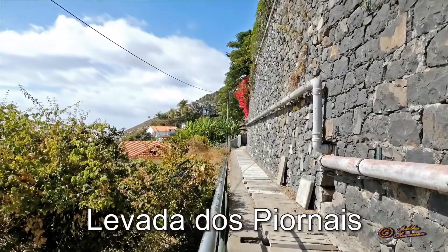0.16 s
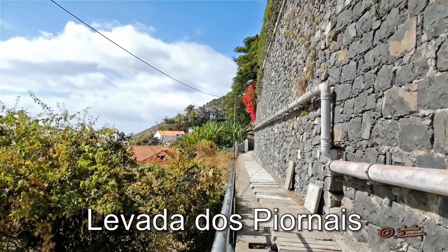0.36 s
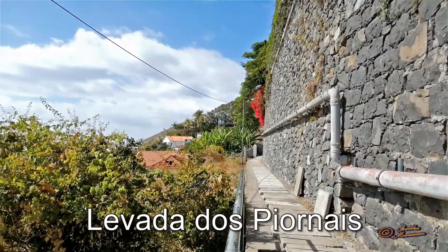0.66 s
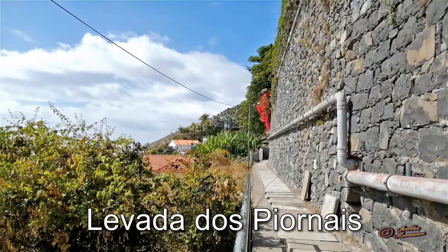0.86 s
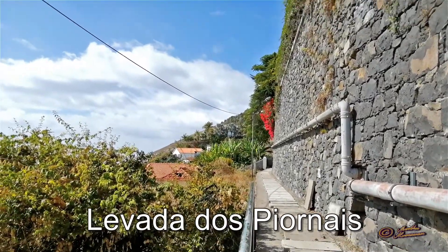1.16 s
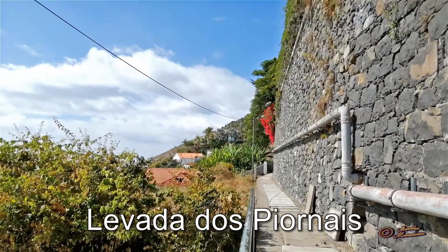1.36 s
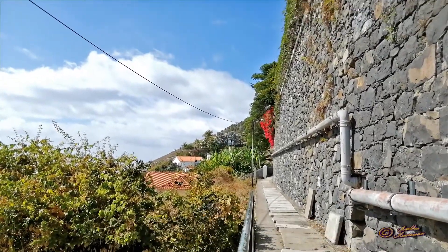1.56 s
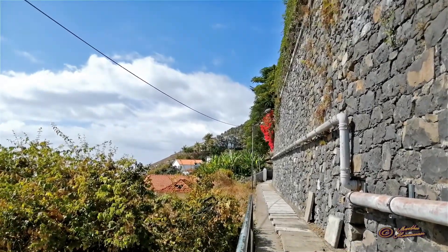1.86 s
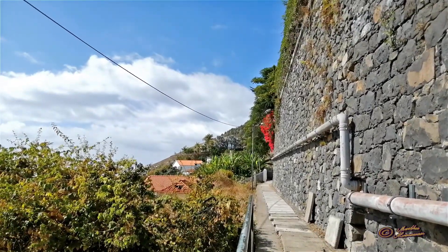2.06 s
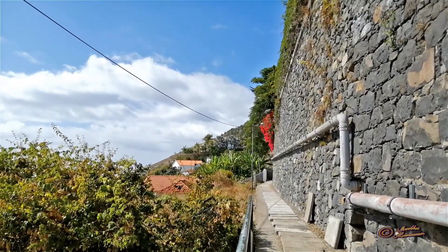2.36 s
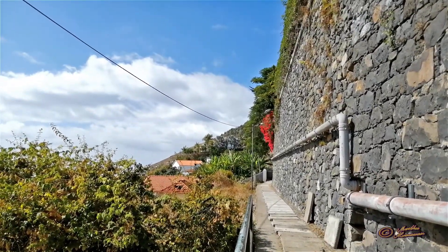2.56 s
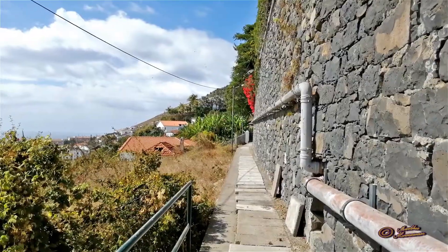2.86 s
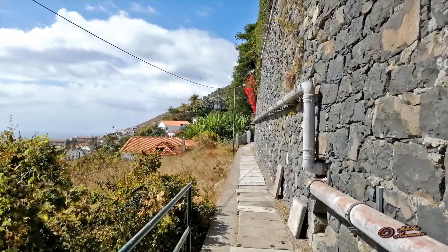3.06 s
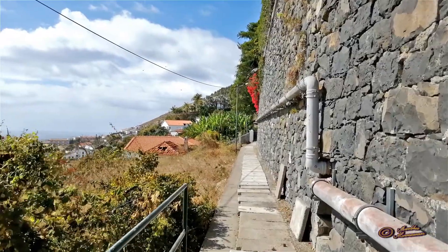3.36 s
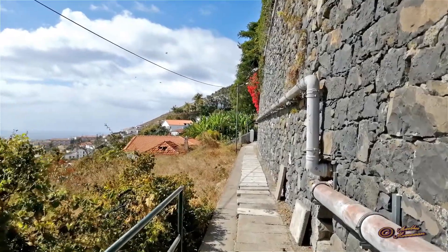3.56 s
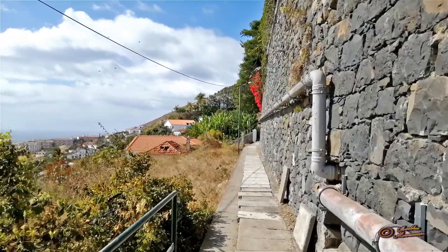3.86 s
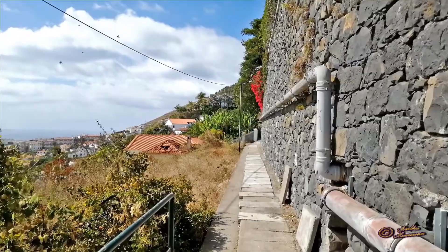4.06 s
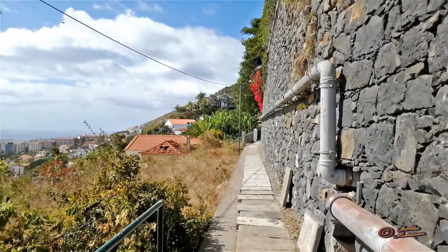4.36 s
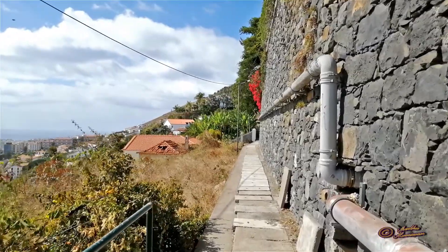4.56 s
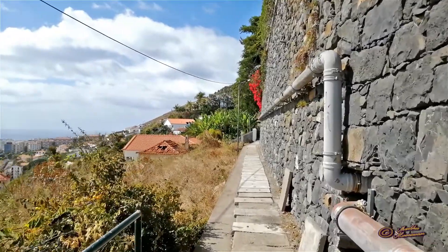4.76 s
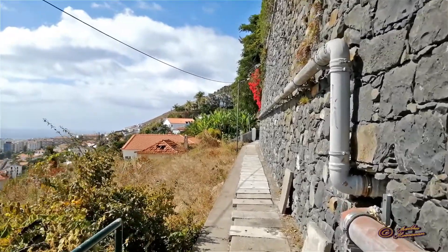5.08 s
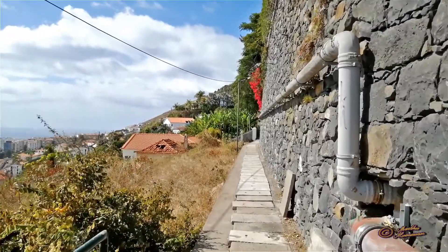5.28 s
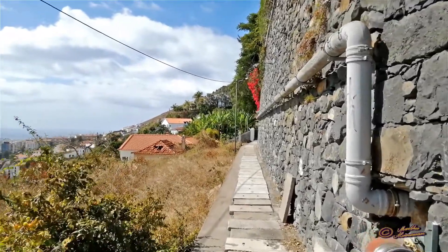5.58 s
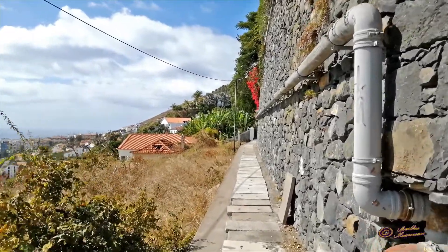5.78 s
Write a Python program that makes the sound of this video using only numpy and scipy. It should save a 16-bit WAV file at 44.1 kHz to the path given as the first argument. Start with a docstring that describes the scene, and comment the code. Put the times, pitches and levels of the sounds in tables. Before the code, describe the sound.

Outdoors, close to a covered stone water channel beside a high wall. Water laps and gurgles throughout in short uneven surges, with bright plops, hollow glugs and fine fizz. Deep wind buffets thump the microphone, strongest just after two seconds and around four seconds. A slab knocks softly a little later. The final seconds are calmer, thinner trickling. Mono, near perspective, only a short dull ring.

```python
"""Water in a stone channel under loose slabs

Water laps in uneven surges beside a high wall: crowds of rising-pitch sine bubbles over coloured-noise wash.
Nearer bubbles, bunches, foam, slaps and sliding glugs stand out, with a hollow slosh of noise below.
Gusts rumble on the microphone as swelling noise bands; a slab knocks dully as three decaying modes.
A faint noise hush lies behind."""
import sys
import numpy as np
from scipy import signal
from scipy.fft import rfft, irfft, next_fast_len
from scipy.io import wavfile
from scipy.ndimage import uniform_filter1d

SR = 44100
rng = np.random.default_rng(int(sys.argv[2]) if len(sys.argv) > 2 else 0)


def unload_wav(signal):
    """Save mono or channel-first audio to the path in sys.argv[1] as 16-bit WAV at rate SR, clipped to [-1, 1]."""
    wavfile.write(
        sys.argv[1],
        SR,
        np.round(np.clip(np.atleast_2d(signal).T, -1, 1) * 32767).astype(np.int16),
    )


N = 261064

# far hush of the valley: (frequency [Hz], density [dB per Hz])
HUSH_COLOUR = [(100, -12), (250, -5), (400, 7.5), (500, -20), (2000, -43), (8000, -29), (11000, -26.5),
               (15000, -43)]
HUSH_DB = -74

# gusts: (start [s], hold [s], big eddies [dB], middling eddies [dB], small eddies [dB])
GUSTS = [(0.0, 0.077, -27, -37, -38), (0.346, 0.11, -36.5, -71, -47.5), (0.587, 0.045, -30, -44, -51),
         (0.85, 0.068, -25.5, -49, -44.5), (1.016, 0.12, -27, -41.5, -47), (1.343, 0.12, -31, -39.5, -44.5),
         (1.526, 0.31, -38.5, -60, -57), (1.892, 0.17, -29, -34.5, -42.5), (2.16, 0.023, -15.5, -32, -37),
         (2.298, 0.064, -24, -34, -43), (2.416, 0.28, -32.5, -42, -45), (2.89, 0.17, -39, -52.5, -61.5),
         (3.087, 0.018, -31, -67, -52), (3.23, 0.04, -30.5, -33.5, -43), (3.54, 0.15, -35, -44.5, -62),
         (3.751, 0.078, -32.5, -43.5, -50.5), (4.055, 0.041, -18.5, -24, -43),
         (4.176, 0.093, -16, -27, -35), (4.353, 0.045, -35.5, -40, -44.5), (4.569, 0.04, -35, -37, -43.5),
         (4.687, 0.12, -39.5, -45, -53), (4.964, 0.021, -30, -41.5, -71), (5.087, 0.12, -35, -47, -52.5),
         (5.353, 0.24, -39, -50.5, -55), (5.58, 0.14, -41.5, -63, -59)]
GUST_RISE_S, GUST_FALL_S, GUST_SAG_DB_PER_S = 0.095, 0.083, 22.5   # rise, fall: time per 20 dB
BREEZE_BIG_DB, BREEZE_MIDDLING_DB, BREEZE_SMALL_DB = -53, -59, -62   # between gusts
# colour of the big eddies: (frequency [Hz], density [dB per Hz])
BUFFET_COLOUR = [(18, 14.5), (27, 7), (41, 5.5), (53, -3), (66, -24)]
# colour of the middling eddies: (frequency [Hz], density [dB per Hz])
RUMBLE_COLOUR = [(45, -15), (58, 4.5), (95, -5.5), (125, -12.5), (160, -16.5)]
# colour of the small eddies: (frequency [Hz], density [dB per Hz])
FLUTTER_COLOUR = [(105, -8.5), (150, 1), (220, -8.5), (300, -16), (410, -27), (480, -33.5), (900, -23.5)]
# colour of the gusts' hiss: (frequency [Hz], density [dB per Hz])
RUSH_COLOUR = [(500, 9.5), (1500, -3), (3500, -17), (6000, -6.5), (8700, -13), (10300, -18.5), (13000, -23),
               (15500, -43)]

# dull knocks of a slab: (time [s], level [dB])
KNOCKS = [(3.235, -40), (4.358, -25), (4.565, -24.5)]
# ringing modes of the slab: (frequency [Hz], level [dB], t60 [s])
SLAB_MODES = [(138, -7, 0.067), (167.8, 10, 0.067), (348, -16, 0.086)]

# water heaving under the slabs: (start [s], hold [s], level [dB])
SLOSHES = [(0.0, 0.12, -47), (0.591, 0.3, -52), (0.97, 0.18, -48), (1.35, 0.19, -54.5), (1.974, 0.24, -56),
           (2.183, 0.17, -50.5), (2.533, 0.14, -53), (3.075, 0.087, -51.5), (3.22, 0.16, -53.5),
           (3.694, 0.072, -67.5), (4.048, 0.16, -49), (4.19, 0.11, -48), (4.598, 0.13, -56.5),
           (4.945, 0.14, -59.5), (5.167, 0.11, -60.5), (5.424, 0.059, -54.5), (5.563, 0.026, -53.5)]
SLOSH_RISE_S, SLOSH_FALL_S, SLOSH_SAG_DB_PER_S = 0.068, 0.1, 7   # rise, fall: time per 20 dB
CALM_SLOSH_DB = -64.5
# colour of the sloshing: (frequency [Hz], density [dB per Hz])
SLOSH_COLOUR = [(215, 4), (300, -2), (400, -1.5), (470, -21)]

# wavelets slapping the stone: (time [s], level [dB], t60 [s])
SLAPS = [(0.037, -48, 0.022), (0.103, -50, 0.044), (1.08, -57, 0.11), (1.429, -53, 0.094),
         (1.836, -47, 0.084), (1.877, -54.5, 0.16), (2.191, -49.5, 0.032), (2.239, -33.5, 0.017),
         (2.423, -51, 0.022), (2.634, -54.5, 0.085), (2.945, -57, 0.022), (3.541, -52.5, 0.07),
         (4.079, -54, 0.0235), (4.332, -56, 0.0406), (4.408, -49, 0.014), (5.001, -58, 0.032),
         (5.219, -50.5, 0.057), (5.577, -60.5, 0.132), (5.621, -53, 0.016)]
# colour of the slaps: (frequency [Hz], density [dB per Hz])
SLAP_COLOUR = [(700, -2), (1500, -8), (3500, 2), (6000, -5), (8500, -1), (10300, -14.5), (15000, -22)]
SLAP_RISE_S, SLAP_GRAIN_DB = 0.005, 3.5   # longest rise; rms unevenness

# patches of foam: (middle [s], length [s], pitch [Hz], level [dB])
FOAM = [(0.42, .12, 4970, -71.5), (0.436, 0.12, 6760, -77), (0.639, 0.24, 8700, -75.5),
        (0.808, 0.22, 8540, -72), (1.581, 0.45, 6950, -73), (1.72, 0.42, 4840, -70.5),
        (3.211, 0.79, 4700, -80), (4.823, 0.22, 4910, -69), (5.247, 0.72, 4310, -70),
        (5.301, 0.4, 7840, -75.5), (3.677, 0.3, 5100, -76), (1.043, 0.38, 8500, -70),
        (2.496, 0.51, 8100, -69), (5.862, 0.16, 3075, -70)]

# hollow sliding glugs: (time [s], length [s], start pitch [Hz], end pitch [Hz], level [dB])
GLUGS = [(.002, 0.07, 810, 944, -49), (0.257, 0.071, 792.6, 805, -52), (.63, 0.066, 614, 850, -45),
         (.965, .06, 785, 827, -47), (1.214, .045, 860, 1010, -50), (1.828, 0.042, 540, 610, -51),
         (2.052, 0.057, 782, 990, -45.5), (2.116, 0.034, 1055, 1130, -46.5),
         (2.482, 0.046, 670, 502, -45.5), (2.633, 0.085, 543.6, 747, -44.5), (2.889, 0.035, 824, 940, -43),
         (4.021, 0.028, 787, 856, -55), (4.12, 0.066, 930, 835, -47.5), (4.18, 0.04, 862, 730, -43),
         (4.199, 0.038, 426, 380, -44), (4.23, 0.059, 864, 930, -52.5), (4.253, .04, 300, 340, -43.5),
         (4.26, 0.07, 1100, 1083, -53), (4.494, 0.028, 1210, 1160, -54), (5.627, 0.044, 733, 815, -51),
         (5.697, 0.043, 640, 674, -53.5)]
GLUG_WAVER, GLUG_FLICKER_DB = .02, 2.2   # unsteadiness of pitch (share) and level
GLUG_SKEW = .75   # under 1 the swell peaks early

# bunches of bubbles: (start [s], length [s], middle pitch [Hz], level [dB])
BURSTS = [(.005, 0.0477, 787, -49), (0.057, 0.067, 8000, -63.5), (0.338, 0.13, 1906, -61),
          (0.368, 0.045, 3680, -64), (0.588, 0.12, 1860, -60.5), (0.848, 0.09, 1540, -53),
          (0.997, .12, 1470, -55), (1.28, .025, 1830, -59), (1.839, 0.064, 2920, -63),
          (1.942, 0.096, 1586, -69), (2.18, 0.046, 2380, -60), (2.24, 0.14, 955, -57.5),
          (2.658, 0.12, 3900, -69), (2.893, 0.032, 5100, -61), (2.982, .06, 1560, -65),
          (3.084, 0.055, 1930, -58.5), (3.169, 0.087, 2200, -56.5), (3.194, 0.072, 4480, -62),
          (3.532, 0.038, 1820, -49), (4.05, 0.043, 2600, -58), (4.176, 0.038, 2010, -54.5),
          (4.36, 0.094, 2480, -63), (4.609, 0.087, 2270, -71), (4.612, 0.058, 3660, -68),
          (4.72, 0.19, 1970, -65), (4.968, 0.049, 1810, -56.5), (5.044, 0.04, 2020, -60),
          (5.199, 0.11, 2290, -57.5), (5.227, 0.076, 3660, -75), (5.563, 0.026, 2340, -59),
          (5.649, 0.1, 1900, -76), (5.286, 0.064, 3700, -71), (5.565, 0.053, 3930, -74),
          (5.78, 0.12, 3140, -71)]
BURST_OCTAVES, BURST_CYCLES = 0.96, 40   # pitch range; cycles per t60
FROTH_DB, FROTH_RISE_S, FROTH_T60_S = -13, .008, 0.11

# near bubbles: (time [s], pitch [Hz], level [dB], t60 [s])
PLOPS = [(.008, 1033, -43, 0.043), (.019, 1920, -40, .04), (.038, 910, -28, 0.014), (.064, 1470, -43, .025),
         (.038, 2770, -31, 0.0074), (.04, 1410, -33.5, 0.039), (.078, 2160, -41.5, .022),
         (.082, 582, -37, 0.057), (.082, 1560, -36, 0.029), (.108, 2570, -42, .022),
         (.122, 3350, -44, 0.0142), (.131, 2120, -27.5, 0.013), (.138, 6740, -49.5, 0.0089),
         (.157, 6600, -49, .01), (.2, 1390, -38, 0.028), (.286, 799, -38, 0.081), (.286, 1060, -45, 0.045),
         (.329, 1420, -36, 0.014), (.338, 2965, -42.5, 0.015), (.406, 1504, -41.5, .035),
         (.442, 910, -29.5, 0.017), (.594, 1500, -42.5, 0.039), (.598, 2180, -38, 0.049),
         (.672, 2932, -29, 0.008), (.776, 1510, -41, 0.027), (.832, 1714, -42, .03),
         (.835, 3570, -44, 0.019), (.868, 606, -29.5, 0.16), (.88, 2600, -40, .02), (.93, 1680, -50, 0.031),
         (.968, 8040, -44, .009), (.969, 1378, -42, 0.027), (.972, 3445, -42, 0.0158),
         (1.0, 597, -38.5, 0.077), (1.039, 1492, -42, 0.034), (1.085, 4150, -43, .012),
         (1.088, 1430, -40, .021), (1.108, 2054, -34.5, 0.035), (1.213, 870, -49, .05),
         (1.222, 2700, -49, .022), (1.261, 3720, -37, 0.013), (1.285, 575, -43.5, 0.072),
         (1.289, 927, -29, 0.041), (1.29, 1370, -36.5, 0.04), (1.365, 368, -41.5, 0.12),
         (1.383, 589, -36, 0.15), (1.38, 2067, -41, 0.0194), (1.385, 6660, -45, .011),
         (1.399, 2598, -45, .026), (1.406, 4570, -29, 0.0023), (1.451, 2840, -41.5, 0.021),
         (1.452, 1656, -31.5, 0.04), (1.516, 1495, -41, .024), (1.521, 6900, -37.5, 0.02),
         (1.521, 3150, -40, 0.013), (1.538, 3760, -33, 0.0046), (1.561, 2030, -47, 0.041),
         (1.693, 4650, -45.5, 0.032), (1.816, 3020, -32.5, 0.0085), (1.837, 4620, -40.5, .016),
         (1.847, 2296, -38.5, 0.021), (1.876, 1534, -40, 0.086), (1.926, 740, -26, 0.013),
         (1.944, 2560, -41, 0.023), (1.945, 1683, -37, 0.022), (1.947, 900, -35.5, .035),
         (1.99, 1380, -41, 0.056), (2.006, 5490, -41.5, 0.0074), (2.01, 880, -39.5, 0.045),
         (2.15, 3900, -30, 0.011), (2.161, 3250, -32, 0.017), (2.167, 4950, -34, .0071),
         (2.177, 2580, -30, 0.011), (2.192, 3120, -33, .015), (2.199, 7735, -39.5, .01),
         (2.207, 2430, -30, 0.02), (2.207, 1785, -33, 0.034), (2.21, 379, -38, 0.059),
         (2.241, 7000, -36, 0.0018), (2.245, 3380, -35.5, 0.019), (2.255, 925, -39, 0.1),
         (2.278, 2526, -40, .018), (2.286, 1570, -30, 0.018), (2.286, 1010, -40, 0.014),
         (2.325, 930, -40, 0.048), (2.344, 1940, -43, .022), (2.308, 5220, -31.5, 0.0034),
         (2.365, 2490, -40, 0.0306), (2.422, 4830, -39, .011), (2.423, 3170, -30, 0.014),
         (2.446, 2446, -36, 0.028), (2.446, 3904, -43, .014), (2.468, 3760, -32.5, 0.0088),
         (2.489, 590, -31.5, 0.029), (2.529, 826, -25, 0.038), (2.574, 2630, -45, 0.018),
         (2.6, 2450, -30, 0.015), (2.606, 3100, -42, 0.021), (2.611, 1400, -48.5, 0.044),
         (2.632, 3560, -42, 0.016), (2.636, 1600, -32.5, 0.03), (2.636, 564, -34, 0.063),
         (2.645, 3120, -41.5, 0.018), (2.707, 685, -27.5, 0.017), (2.781, 1632, -31.5, 0.034),
         (2.91, 6080, -35, 0.013), (2.934, 2440, -38, .025), (2.946, 4330, -38.5, 0.0059),
         (2.946, 6960, -42.5, .01), (2.986, 4134, -41.5, 0.011), (2.989, 2720, -31, 0.012),
         (3.006, 1220, -33, 0.02), (3.055, 747, -42, 0.046), (3.085, 344, -38, 0.047),
         (3.091, 1276, -35.5, 0.04), (3.187, 2530, -35, 0.021), (3.218, 3380, -32, 0.015),
         (3.258, 548, -40, 0.054), (3.473, 2970, -48, 0.02), (3.492, 3070, -38.5, 0.013),
         (3.534, 1690, -45, 0.035), (3.534, 1310, -42, 0.037), (3.548, 2230, -36.5, 0.035),
         (3.57, 1200, -40, 0.064), (3.735, 1160, -43.5, .06), (3.789, 1660, -42.5, 0.04),
         (3.79, 3370, -46, 0.012), (3.812, 6630, -54, .01), (3.975, 661, -35.5, 0.15),
         (3.985, 1297, -39, 0.032), (4.063, 1390, -36.5, .028), (4.08, 2390, -32.5, 0.013),
         (4.086, 1310, -34.5, 0.022), (4.186, 1280, -28, 0.016), (4.189, 1624, -32, 0.029),
         (4.192, 2400, -42, 0.0069), (4.209, 4520, -35.5, 0.011), (4.21, 1970, -28.5, 0.012),
         (4.331, 492, -30.5, 0.039), (4.332, 694, -32, .014), (4.332, 3030, -35, 0.0086),
         (4.368, 2240, -40, .036), (4.375, 1620, -41, 0.024), (4.423, 676, -34.5, 0.098),
         (4.425, 1645, -37, 0.054), (4.562, 2423, -42.5, 0.034), (4.635, 1320, -37.5, 0.039),
         (4.644, 3000, -41.5, 0.015), (4.727, 1410, -43.5, 0.023), (4.77, 4620, -43, 0.013),
         (4.844, 1500, -36, 0.012), (4.977, 7500, -48, 0.0085), (5.003, 1260, -38.5, 0.017),
         (5.102, 7260, -46.5, 0.0076), (5.201, 1252, -43, 0.0314), (5.201, 4134, -46, 0.015),
         (5.202, 2350, -33.5, 0.019), (5.237, 2220, -34.5, 0.017), (5.269, 1330, -37.5, 0.024),
         (5.323, 8240, -45, 0.012), (5.343, 2950, -41, 0.012), (5.391, 4194, -39, 0.011),
         (5.417, 4130, -41, 0.008), (5.445, 2280, -31.5, 0.023), (5.452, 1560, -42, 0.028),
         (5.484, 8140, -49, 0.0062), (5.545, 346, -52, 0.117), (5.58, 1119, -34.5, 0.076),
         (5.681, 1790, -41, 0.024), (5.728, 8200, -51, 0.0067)]
PLOP_RISE_PER_S = 3.8   # share of its pitch that a bubble gains per second
PINCH_CYCLES = 0.95   # time constant of the onset
# lesser near bubbles, at random
STRAYS_PER_S, STRAY_LOW_HZ, STRAY_HIGH_HZ, STRAY_CYCLES = 6, 930, 6700, 49   # cycles per t60
STRAY_DB, STRAY_SPREAD_DB, STRAY_DB_PER_OCTAVE = -46, 19, 6
# bubbles shed by a near one: level re its own, latest start, pitch range
COMPANION_DB, COMPANION_LAG_S, COMPANION_OCTAVES = -10.5, .014, 0.83

# surges of the flow: (start [s], hold [s], level before trims [dB],
# large bubbles [dB re level], tiny bubbles [dB re level])
SURGES = [(0.0, 0.18, -58.5, 1, -10.5), (0.353, 0.1, -60, 4, -8.5), (0.592, 0.13, -61, 7.5, -8),
          (0.84, 0.31, -56.5, 4.5, -5.5), (1.29, 0.17, -57, 5, -8.5), (1.525, 0.014, -55.5, 3, -8),
          (1.64, 0.31, -60, -2.5, -11.5), (1.83, 0.27, -55, -5, -11.5), (2.159, 0.049, -49.5, 0.5, -6),
          (2.24, 0.3, -57, -12, -6.5), (2.42, 0.2953, -64, 14, -5), (2.918, 0.25, -60.5, 6.5, -8.5),
          (3.201, 0.11, -63, -2, -12), (3.542, 0.029, -60.5, 4.5, -6), (3.62, 0.043, -62, -4, -15),
          (3.706, 0.068, -57.5, -12, -16), (3.987, 0.16, -54.5, -2.5, -10.5),
          (4.17, 0.25, -54.5, 2.5, -7.5), (4.605, 0.16, -57.5, -7, -13), (4.947, 0.19, -58.5, -2, -18.5),
          (5.177, 0.12, -55, -0.5, -15), (5.445, 0.15, -58.5, -1, -15.5), (5.582, 0.14, -61, 0, -16),
          (4.76, 0.172, -72, -9, -13), (5.774, 0.076, -64, -10, -27)]
SURGE_RISE_S, SURGE_FALL_S, SURGE_SAG_DB_PER_S = 0.066, 0.099, 2.5   # rise, fall: time per 20 dB
CALM_GURGLE_DB, CALM_BABBLE_DB, CALM_SPRAY_DB = -68, -68.5, -77   # between surges, before trims
# colour of the large bubbles: (frequency [Hz], density [dB per Hz])
GURGLE_COLOUR = [(350, 12), (500, -2), (680, 4.5), (850, 1.5), (1100, -2), (1400, 2)]
# colour of the middling bubbles: (frequency [Hz], density [dB per Hz])
BABBLE_COLOUR = [(1000, -8.5), (1300, 2.5), (1800, 1.5), (2400, 2), (3000, -5.5), (3800, -37)]
# colour of the tiny bubbles: (frequency [Hz], density [dB per Hz])
SPRAY_COLOUR = [(2800, 7.5), (3500, 2), (4600, 2.5), (5800, -4), (7200, -0.5), (8700, -2.5), (9600, -7.5),
                (10300, -11.5), (12000, -11), (15500, -17)]

CHANNEL_T60_S, CHANNEL_DB = 0.071, -15.5   # ring between the channel walls
CUTOFF_HZ = 15700


def from_db(db):
    """Decibels to gain."""
    return 10 ** (np.asarray(db) / 20)


def rms_one(x):
    """Scale to rms 1."""
    return x / np.sqrt(np.mean(x ** 2) + 1e-20)


def add(out, sound, time_s):
    """Mix a sound in at a time."""
    at = int(np.clip(round(time_s * SR), 0, N - 1))
    out[at:at + len(sound)] += sound[:N - at]


def colour(x, spectrum):
    """Weight a sound by a smooth spectrum, falling steeply beyond its ends; rms 1."""
    hz, db = np.transpose(spectrum)
    size = next_fast_len(N, True)
    bin_hz = np.arange(size // 2 + 1) * SR / size
    log_hz = np.log(np.maximum(bin_hz, 1))
    beyond = np.abs(log_hz - np.clip(log_hz, np.log(hz[0]), np.log(hz[-1])))
    gain = from_db(np.interp(log_hz, np.log(hz), db) - 50 * beyond)
    return rms_one(irfft(rfft(x, size) * gain, size)[:N])


def noise(spectrum):
    """Coloured noise of rms 1."""
    return colour(rng.standard_normal(N), spectrum)


def evened(x, span_s):
    """Hold the strength near 1 over a span; quicker detail stays."""
    size = max(int(span_s * SR), 2)
    power = uniform_filter1d(uniform_filter1d(x ** 2, size), size)
    return x / np.sqrt(np.abs(power) + 1e-6)


def steadied(x, span_s):
    """Divide out the chance swells of a noise, leaving its strength to the events; rms 1."""
    envelope = np.abs(signal.hilbert(x, next_fast_len(N))[:N])
    swell = uniform_filter1d(envelope, max(int(span_s * SR), 2))
    return rms_one(x / (swell + .1))


def swells(starts, holds, levels_db, calm_db, rise_s, fall_s, sag_db_per_s):
    """Level in dB of swells that rise, sag while they hold and fall back to a calm; powers add."""
    t = np.arange(0, N, 32) / SR
    power = from_db(calm_db) ** 2
    for start, hold, db in zip(starts, holds, levels_db):
        edges = np.maximum(start - t, 0) / rise_s + np.maximum(t - start - hold, 0) / fall_s
        sag_db = sag_db_per_s * (np.clip(t - start, 0, hold) - hold / 2)
        power = power + from_db(db - sag_db - 20 * edges) ** 2
    return np.interp(np.arange(N) / SR, t, 10 * np.log10(power))


def channel(x):
    """The stone walls add a short dull ring, drawn anew every 0.1 s as the splashes shift about."""
    t, hop = np.arange(SR // 8) / SR, SR // 10
    dull = signal.butter(1, 4000, fs=SR, output="sos")
    decay = from_db(-60 * t / CHANNEL_T60_S) * (t > .003)
    window = np.hanning(2 * hop)
    out, padded = np.zeros(N + SR), np.pad(x, (hop, 2 * hop))
    for at in range(0, N + hop, hop):
        tail = signal.sosfilt(dull, rng.standard_normal(len(t))) * decay
        tail /= np.sqrt(np.sum(tail ** 2))
        ring = signal.fftconvolve(padded[at:at + 2 * hop] * window, tail)
        out[at:at + len(ring)] += ring
    return x + from_db(CHANNEL_DB) * out[hop:hop + N]


def hush():
    """The far valley is a steady coloured noise."""
    return from_db(HUSH_DB) * noise(HUSH_COLOUR)


def gusting(levels_db, calm_db):
    """Level in dB of one size class of eddies through the gusts."""
    starts, holds = np.transpose(GUSTS)[:2]
    return swells(starts, holds, levels_db, calm_db, GUST_RISE_S, GUST_FALL_S, GUST_SAG_DB_PER_S)


def wind():
    """Big eddies push slowly on the microphone, smaller ones flutter above; a hiss follows the big ones."""
    breeze_db = BREEZE_BIG_DB, BREEZE_MIDDLING_DB, BREEZE_SMALL_DB
    big_db, middling_db, small_db = map(gusting, np.transpose(GUSTS)[2:], breeze_db)
    buffet = from_db(big_db) * steadied(noise(BUFFET_COLOUR), span_s=0.01)
    rumble = from_db(middling_db) * steadied(noise(RUMBLE_COLOUR), span_s=0.024)
    flutter = from_db(small_db) * steadied(noise(FLUTTER_COLOUR), span_s=0.052)
    gust = uniform_filter1d(from_db(big_db), SR // 8)
    pressure = noise([(4, 10.0), (11, -0.5), (16, 1.0)])   # slow swings
    sway = from_db(5.5) * gust * steadied(pressure, span_s=0.0066)
    rush = from_db(-42.5) * gust * noise(RUSH_COLOUR)
    return sway + buffet + rumble + flutter + rush


def slab():
    """A soft blow sets the slab's low modes ringing briefly."""
    t, out = np.arange(SR // 4) / SR, np.zeros(N)
    ring = np.zeros(len(t))
    for hz, db, t60_s in SLAB_MODES:
        ring += from_db(db - 60 * t / t60_s) * np.sin(2 * np.pi * hz * t)
    blow = ring * np.minimum(t / 0.01, 1) ** 2
    for time_s, db in KNOCKS:
        add(out, from_db(db) * blow, time_s)
    return out


def sloshing():
    """Water heaves in the covered hollow and gives a dull low wash."""
    level_db = swells(*np.transpose(SLOSHES), CALM_SLOSH_DB, SLOSH_RISE_S, SLOSH_FALL_S, SLOSH_SAG_DB_PER_S)
    return from_db(level_db) * steadied(noise(SLOSH_COLOUR), span_s=0.044)


def slaps():
    """A wavelet breaks and throws a short, uneven shower of drops: decaying noise of ragged level."""
    swell, t = np.zeros(N), np.arange(SR // 5) / SR
    for time_s, db, t60_s in SLAPS:
        rise = np.minimum(t / min(SLAP_RISE_S, t60_s / 10), 1)
        add(swell, from_db(db - 60 * t / t60_s) * rise, time_s)
    grain = from_db(SLAP_GRAIN_DB * noise([(40, 1), (300, -18)]))
    return swell * noise(SLAP_COLOUR) * grain


def spatter(size):
    """A second of noise clumped into tiny pops about `size` samples long."""
    clumps = rms_one(uniform_filter1d(rng.standard_normal(SR), size))
    return rng.standard_normal(SR) * np.exp(1.05 * clumps)


def foam():
    """Crowds of like-sized tiny bubbles fizz up and fade: spattering noise in a narrow band."""
    out = np.zeros(N)
    for middle_s, length_s, hz, db in FOAM:
        band = signal.butter(2, [hz * .93, hz * 1.07], "band", fs=SR, output="sos")
        fizz = rms_one(signal.sosfilt(band, spatter(size=90)))
        swell = np.hanning(int(min(length_s, 1) * SR)) ** .5
        add(out, from_db(db) * swell * fizz[:len(swell)], middle_s - length_s / 2)
    return out


def bubble(hz, t60_s, rise):
    """An air pocket pinches off within a cycle or two and rings, its pitch rising as it nears the surface."""
    t60_s = max(t60_s, .002)
    t = np.arange(int(t60_s * SR)) / SR
    pinch = (1 - np.exp(-t * hz / PINCH_CYCLES)) ** 2
    swing = from_db(-60 * t / t60_s) * pinch
    cycles = hz * (t + rise * t * t / (2 * t60_s))   # pitch climbs by the share `rise` over t60
    return swing * np.sin(2 * np.pi * cycles)


def glugs():
    """A pocket of air under a slab swells into a hollow note, sliding as water squeezes it or lets go."""
    out = np.zeros(N)
    for (time_s, length_s, start_hz, end_hz, db), draws in zip(GLUGS, rng.standard_normal((len(GLUGS), 2, 7))):
        part = np.linspace(0, 1, int(length_s * SR))
        waver, flicker = (np.interp(part, np.linspace(0, 1, len(d)), d) for d in draws)
        hz = start_hz * (end_hz / start_hz) ** part * (1 + GLUG_WAVER * waver)
        swell = np.abs(np.sin(np.pi * part ** GLUG_SKEW))
        level = from_db(db + GLUG_FLICKER_DB * flicker)
        add(out, swell * level * np.sin(2 * np.pi * np.cumsum(hz) / SR), time_s)
    return out


def bursts(count):
    """A wavelet traps a pocket of air, which breaks into a tight bunch of bubbles in a soft froth."""
    out, t = np.zeros(N), np.arange(SR // 2) / SR
    for (start_s, length_s, hz, db), draws in zip(BURSTS, rng.random((len(BURSTS), count, 3))):
        bunch = np.zeros(N)
        for k, (lag, size, force) in enumerate(draws):
            pitch_hz = hz * 2 ** (BURST_OCTAVES * (size - .5))
            ring = bubble(pitch_hz, BURST_CYCLES / pitch_hz, 0.14)
            add(bunch, (.5 + force) * ring, length_s * (k + lag) / count)
        bunch = bunch[:len(t)]
        bunch = bunch * np.sqrt(length_s * SR / np.sum(bunch ** 2))   # rms 1 over its length
        band_hz = hz * 2 ** (BURST_OCTAVES * np.array([-.5, .5]))
        band = signal.butter(2, band_hz, "band", fs=SR, output="sos")
        froth = rms_one(signal.sosfilt(band, rng.standard_normal(len(t))))
        froth_db = FROTH_DB - 60 * np.maximum(t - length_s, 0) / FROTH_T60_S
        froth *= np.minimum(t / FROTH_RISE_S, 1) * from_db(froth_db)
        add(out, from_db(db) * (bunch + froth), start_s)
    return out


def strays(flow_db):
    """Lesser near bubbles of random size, stronger in a surge: rows like those of the plops."""
    rows, surge_db = [], flow_db - flow_db.mean()
    for when, size, force in rng.random((int(STRAYS_PER_S * N / SR), 3)):
        hz = STRAY_LOW_HZ * (STRAY_HIGH_HZ / STRAY_LOW_HZ) ** size
        tilt_db = STRAY_DB_PER_OCTAVE * np.log2(hz / STRAY_LOW_HZ)
        db = STRAY_DB + surge_db[int(when * N)] + tilt_db - STRAY_SPREAD_DB * force
        rows.append((when * N / SR, hz, db, STRAY_CYCLES / hz))
    return rows


def companions(rows, count):
    """Each near bubble sheds lesser ones just after it, which turn a pure blip into a gurgle."""
    out = np.zeros(N)
    for (time_s, hz, db, t60_s), draws in zip(rows, rng.random((len(rows), count, 2))):
        for lag, size in draws:
            pitch_hz = hz * 2 ** (COMPANION_OCTAVES * (size - .3))
            ring = bubble(pitch_hz, min(t60_s, 25 / pitch_hz), 0.11)
            add(out, from_db(db + COMPANION_DB) * ring, time_s + COMPANION_LAG_S * lag)
    return out


def plops(rows, tick_db):
    """Near bubbles ring; each starts with the soft noise tick of the surface closing over it."""
    out, t = np.zeros(N), np.arange(SR // 100) / SR
    for (time_s, hz, db, t60_s), grit in zip(rows, rng.standard_normal((len(rows), len(t)))):
        add(out, from_db(db) * bubble(hz, t60_s, PLOP_RISE_PER_S * t60_s), time_s)
        band = signal.butter(2, [hz / 2, min(2 * hz, 9500)], "band", fs=SR)
        tick = signal.lfilter(*band, grit * np.exp(-t / 0.00047))
        add(out, from_db(db + tick_db) * tick, time_s)
    return out


def bubbling(spectrum, low_hz, high_hz, per_s, cycles, spread_db, rise, wash_db):
    """A crowd of bubbles of one size class over the wash of the water that makes them; strength near 1."""
    out = np.zeros(N)
    for when, size, force, damping, depth in rng.random((int(per_s * N / SR), 5)):
        hz = low_hz * (high_hz / low_hz) ** size
        strength = from_db(spread_db * min(-np.log(1 - force), 4))   # many faint ones, few strong ones
        t60_s = cycles * 2 ** (2 * damping - 1) / hz
        ring = bubble(hz, t60_s, rise * depth ** 2)
        add(out, strength * np.sqrt(hz / low_hz) * ring, when * N / SR)
    crowd = colour(channel(out), spectrum)
    return evened(crowd + from_db(wash_db) * noise(spectrum), span_s=0.1)


def surging(levels_db, calm_db):
    """Level in dB of one size class of bubbles through the surges."""
    starts, holds = np.transpose(SURGES)[:2]
    return swells(starts, holds, levels_db, calm_db, SURGE_RISE_S, SURGE_FALL_S, SURGE_SAG_DB_PER_S)


def water():
    """Each surge wakes large, middling and tiny bubbles; near ones ring out above the crowd."""
    level_db, large_db, tiny_db = np.transpose(SURGES)[2:]
    gurgle_db = surging(level_db + large_db, CALM_GURGLE_DB)
    babble_db = surging(level_db, CALM_BABBLE_DB)
    spray_db = surging(level_db + tiny_db, CALM_SPRAY_DB)
    gurgle = bubbling(GURGLE_COLOUR, low_hz=439.0, high_hz=1179.0, per_s=250, cycles=49.6,
                      spread_db=6.0, rise=0.514, wash_db=-5.5)
    babble = bubbling(BABBLE_COLOUR, low_hz=1129, high_hz=3326, per_s=1400, cycles=50,
                      spread_db=4.5, rise=0.25, wash_db=-9)
    spray = bubbling(SPRAY_COLOUR, low_hz=3137, high_hz=10420, per_s=3000, cycles=70,
                     spread_db=5.0, rise=0.05, wash_db=-3)
    # trims of -2.5 and -0.77 dB
    flow = from_db(gurgle_db) * gurgle + from_db(babble_db - 2.5) * babble + from_db(spray_db - 0.77) * spray
    rows = list(PLOPS) + strays(babble_db)
    near = plops(rows, tick_db=-10.5) + companions(rows, count=2) + bursts(count=12) + glugs()
    near = signal.sosfilt(signal.butter(6, 10000, fs=SR, output="sos"), near)   # low-pass
    return flow + foam() + slaps() + from_db(-0.37) * channel(near)


def scene():
    """Far valley, wind, slab and water at one microphone."""
    return (hush() + wind() + slab() + sloshing() + water())[None]


def record(dry):
    """A steep low-pass cuts the top."""
    return signal.sosfilt(signal.ellip(10, .1, 80, CUTOFF_HZ, fs=SR, output="sos"), dry)


dry = scene()
out = record(dry)
unload_wav(out)
```